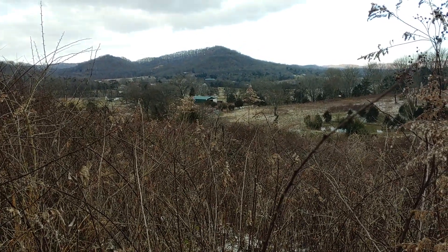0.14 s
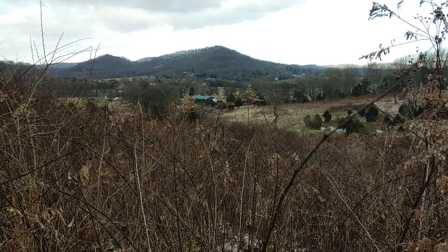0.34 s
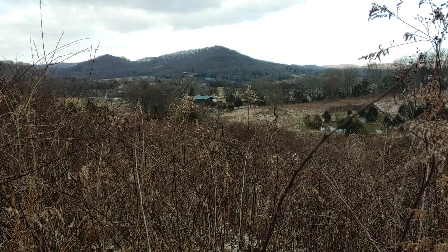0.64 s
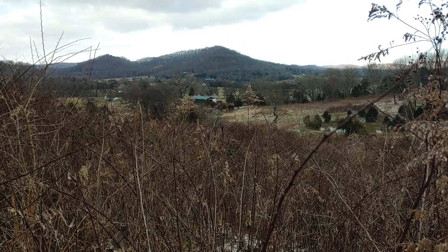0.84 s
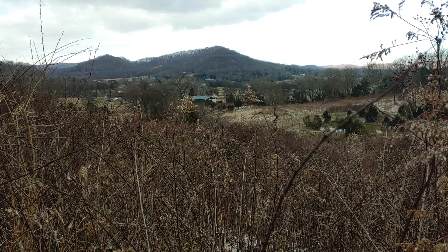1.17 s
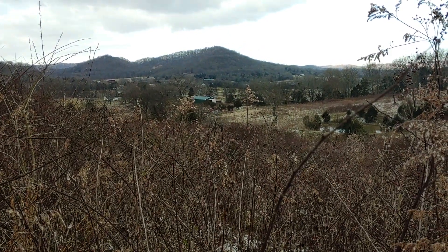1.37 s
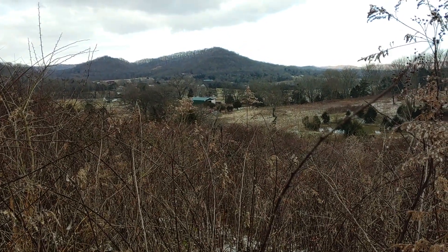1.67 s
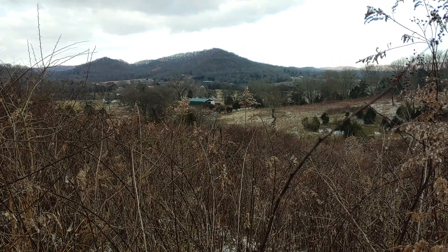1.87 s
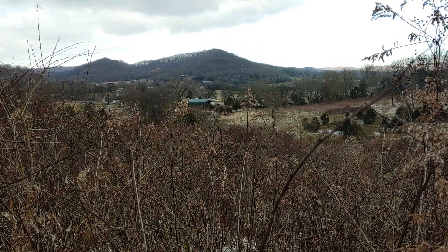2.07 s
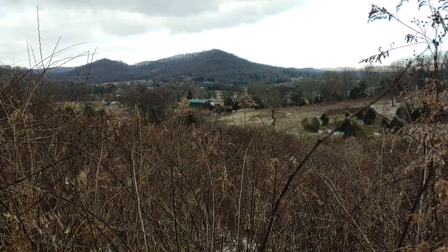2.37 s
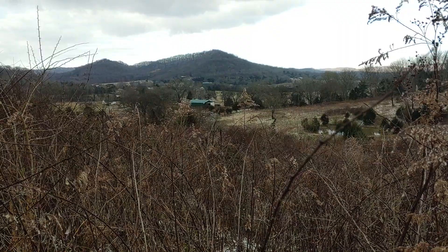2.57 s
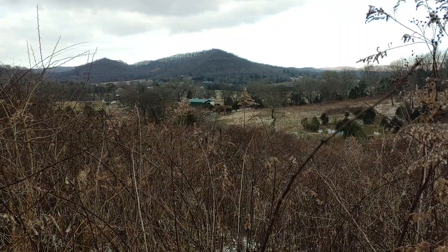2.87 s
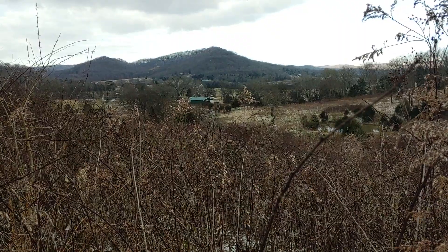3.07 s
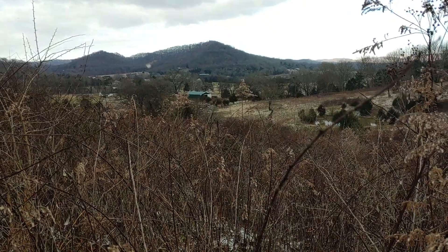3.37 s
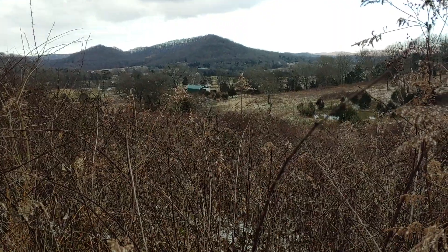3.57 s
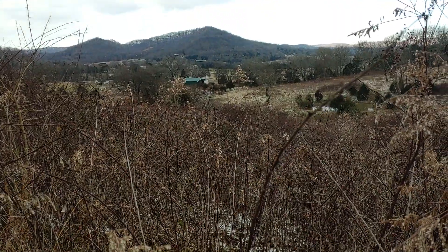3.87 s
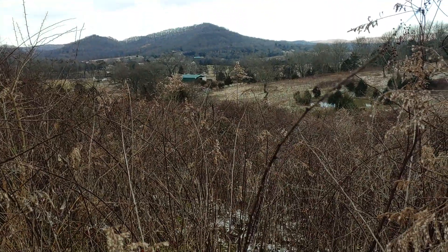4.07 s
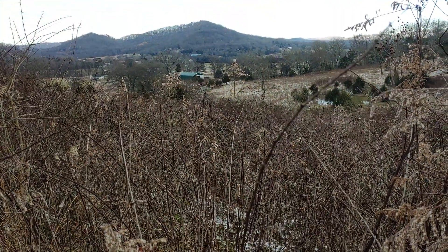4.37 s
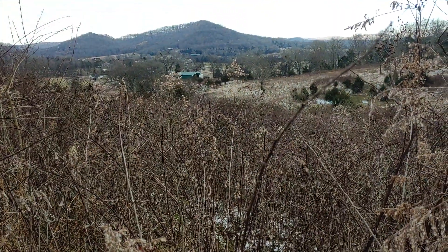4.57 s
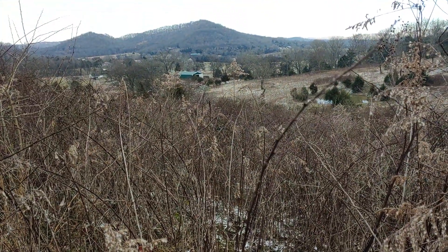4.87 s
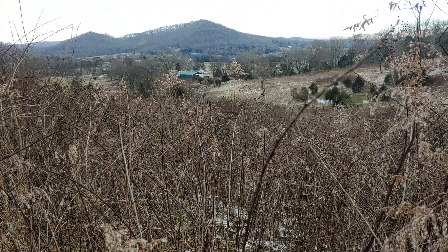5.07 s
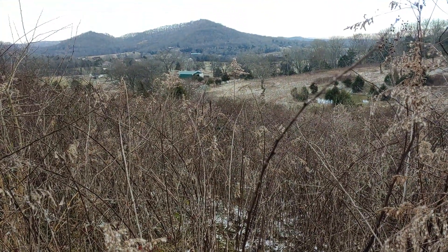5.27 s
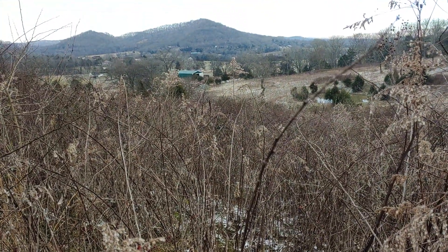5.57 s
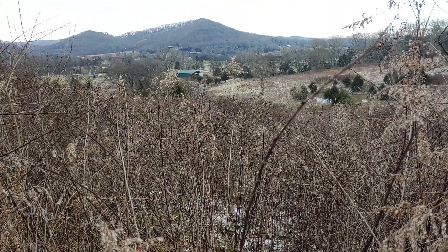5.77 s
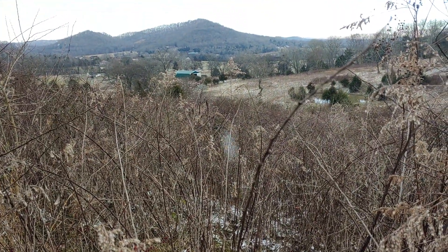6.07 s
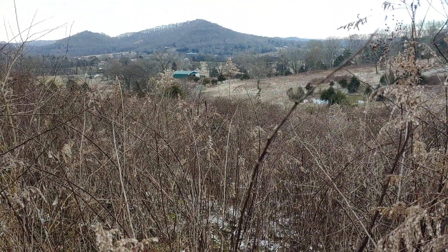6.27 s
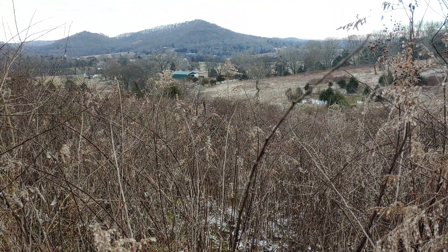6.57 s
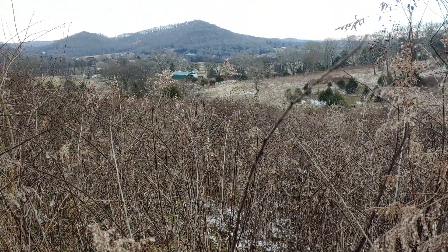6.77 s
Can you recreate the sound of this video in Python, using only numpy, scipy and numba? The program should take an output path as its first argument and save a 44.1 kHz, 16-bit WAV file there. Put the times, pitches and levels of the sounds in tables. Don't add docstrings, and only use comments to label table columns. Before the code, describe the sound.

Repeated hoarse hound baying at close to middle distance in open country, with heavy low wind buffeting midway and dry stems ticking near the end.

```python
import sys
import numpy as np
from scipy import signal
from scipy.fft import rfft, irfft
from scipy.io import wavfile
from scipy.ndimage import uniform_filter1d
from numba import njit

SR = 44100
rng = np.random.default_rng(int(sys.argv[2]) if len(sys.argv) > 2 else 0)


def amplitude_ratio(level_db):
    exponent = np.asarray(level_db, float) / 20
    return 10 ** exponent


def generate_wav(signal):
    frames = np.transpose(np.atleast_2d(signal))
    scaled = np.clip(frames, -1, 1) * 32767
    pcm = np.round(scaled).astype(np.int16)
    wavfile.write(sys.argv[1], SR, pcm)


N = 306054
TIME = np.arange(N) / SR


# (t/s, pitch f/Hz, chest level/dB, open-jaw level/dB)
FIRST_BAY = [(.827, 505, -38.5, -67.5), (.86, 652, -27.5, -42), (.895, 615, -21, -41),
             (1.11, 650, -25, -41.5), (1.2, 545, -34, -50), (1.37, 650, -25, -31.5),
             (1.483, 570, -27.5, -42.5), (1.497, 619, -34, -43.5), (1.61, 539.6, -27.5, -61)]
SECOND_BAY = [(2.198, 534.2, -27.5, -45.5), (2.259, 583, -21.5, -40), (2.39, 585, -22.5, -53.5),
              (2.51, 548, -24.5, -53), (2.6, 617.8, -25, -47), (2.72, 634, -22.5, -53.5),
              (2.763, 620, -24, -55), (2.785, 568.7, -22, -44.5), (2.83, 553.5, -26, -44.5)]
THIRD_BAY = [(3.226, 542, -25, -33), (3.29, 562, -23.5, -36.5), (3.392, 549, -21.5, -45.5),
             (3.503, 610, -23.5, -54), (3.601, 570, -27, -50.5), (3.7, 550, -34, -47)]
FOURTH_BAY = [(4.029, 636.3, -27.5, -38.5), (4.062, 560, -20.5, -38.5), (4.13, 561.8, -27, -41.5),
              (4.279, 560, -22.5, -46), (4.47, 545.6, -29, -69), (4.548, 528, -24.5, -48),
              (4.65, 510.7, -32.5, -43.5)]
FIFTH_BAY = [(5.07, 586.9, -30.5, -43), (5.098, 631.8, -26.5, -35), (5.15, 543.3, -25, -58),
             (5.303, 540.7, -30.5, -53), (5.399, 527, -31.5, -66), (5.472, 532.6, -29, -54),
             (5.563, 494, -41.5, -47.5)]
SIXTH_BAY = [(5.869, 529.5, -29, -45), (5.938, 555, -23, -48), (6.031, 540.7, -29.5, -55),
             (6.089, 510.4, -44, -60)]
LAST_BAY = [(6.903, 570, -24.5, -38), (6.931, 610, -30, -37.5), (6.94, 561, -34, -56.5)]
# (f/Hz, width/Hz, level/dB, change when tired/dB)
UNDERTONE = [(204, 100, -9.5, 0.5), (298, 205, 13.5, -0.5)]
CHEST = [(447, 90, -9.5, 17), (545, 185, 6.5, -1.5), (650, 246, 0.5, -1)]
MOUTH = [(790, 342, -7.5, 0), (1027, 104.5, 8, -1), (1288, 171, -1.5, 4), (1612.7, 85, -17.5, 24.5)]
JAW = [(1948, 110, 5, 0.059), (2320, 170, -3.5, 2.1)]
NOSE = [(2713, 23, 3, 3.2), (2840, 110, 0.5, 2)]
RASP = [(4200, 150, 0.5, -10.5), (4850, 260, -4, -10.5), (5700, 350, -12, 3), (6156, 180, 5.5, 13),
        (6480, 620, -8.5, 4.5)]
POCKET = [(3300, 45, 2.5, 0.0039), (3320, 180, -9, 0.011)]
# (t/s, centre f/Hz, level/dB)
POCKET_FRESH = [
    [(.87, 3115, -69), (.92, 3160, -55.5), (1.05, 3300, -70), (1.23, 3434, -59), (1.4, 3130, -55.5),
     (1.54, 3320, -57), (1.6, 3320, -82.5)],
    [(2.21, 3305, -68.5), (2.42, 3400, -81.5), (2.53, 3380, -62.5), (2.748, 3300, -62), (2.83, 3300, -80)],
    [(3.23, 3260, -54), (3.378, 3420, -88.5), (3.5, 3452, -68.5), (3.62, 3470, -70), (3.68, 3460, -87.5)],
]
POCKET_TIRED = [(4.04, 3300, -80.5), (4.6, 3370, -86), (5.12, 3270, -70.5), (5.2, 3300, -88),
                (5.88, 3225, -64), (6.05, 3300, -74.5)]
# (t/s, mouth level/dB, upper over lower mouth/dB, throat shortened/%)
TONGUE = [(.86, -1.5, 1.5, 5.5), (.92, -5.5, 10.5, -5), (1.05, 1.5, 6, -5), (1.2, -0.5, -10, -1.5),
          (1.33, -6.5, -7.5, 2.5), (1.44, -4.5, 3, -5), (1.54, 4, 1.5, 3), (1.61, 0.5, 7, 2),
          (2.21, 0, 6.5, 5), (2.3, 1.5, 1.5, 1.5), (2.42, 1, -5.5, 5), (2.55, 3, -3.5, 2.5),
          (2.66, 0.5, -13.5, -3), (2.79, 1, 7.5, 1), (3.24, 2.5, 0, -3), (3.36, 2.5, 0.5, 6),
          (3.49, 2.5, -5, -4), (3.63, 0.5, 0.5, 3.5), (3.72, 0, -2.5, -2.5), (4.04, -3, 4.5, 1.5),
          (4.1, -1, 5.5, 5.5), (4.25, -2.5, 4.5, -1), (4.38, 0.5, -4, -0.5), (4.52, 0, 1, 3),
          (4.64, -3.5, 7.5, -2.5), (5.08, 1.5, 1, -3.5), (5.17, 2, -8, -0.5), (5.3, 1, -6.5, -3.5),
          (5.44, 5, -2, 0.5), (5.55, 1.5, -2, 1.5), (5.88, -7, 6.5, -5), (5.97, -4, -6, 0),
          (6.04, -6.5, -3.5, 6), (6.1, -12, -9.5, 5.5), (6.92, -1, 8.5, -2.5)]
# (t/s, growl level/dB, nose level/dB, rasp level/dB, low over high rasp/dB)
PALATE = [(.86, -1, -2, -5, 2), (.95, -5.5, 2.5, 1.5, -1), (1.06, -13, 5, 6, 10),
          (1.2, 3.5, -4.5, 1.5, 6.5), (1.33, -4.5, -1, 1.5, -2), (1.45, 0, 0.5, 0, 1.5),
          (1.6, -10.5, 0, -2.5, -3), (2.22, 6.5, 7.5, -13, 4.5), (2.35, -1.5, -4.5, 1.5, -9),
          (2.5, -5.5, 2, 1, -5), (2.68, -1.5, 1, 0.5, 4), (2.82, -6, 2.5, 2, 5.5), (3.24, 9.5, -1, -4, 1),
          (3.4, 3, -7, -0.5, 0), (3.55, -3.5, 7.5, 2.5, 5), (3.7, -2.5, 1.5, 0.5, -8),
          (4.05, -3, 1, 10.5, 4.5), (4.2, -6, -7, -0.5, 1.5), (4.38, 0.5, 4, 8.5, 5),
          (4.52, 0.5, 1.5, -4, -3), (4.64, 6, -10, 2.5, 2.5), (5.08, 6, -10, 6, -5), (5.2, 2, 9.5, 4, 6),
          (5.35, 0.5, -3, -8, -5.5), (5.54, 11, 5.5, -1.5, 1.5), (5.88, 15, -1.5, -0.5, -4.5),
          (5.98, -2.5, -1.5, 5, 4), (6.1, 7.5, 6, -8, 2), (6.92, 5.5, -0.5, 2.5, 5)]


def hound():
    course = FIRST_BAY + SECOND_BAY + THIRD_BAY + FOURTH_BAY + FIFTH_BAY + SIXTH_BAY + LAST_BAY
    pitch_hz, chest_db, jaw_db = in_time(course)
    age, left, mouth_db, rasp_db, tiring = phrasing()
    pulses, air, alternate = folds(pitch_hz)
    ring_db, upper_db, shortened = in_time(TONGUE)
    growl_db, nostril_db, scrape_db, low_rasp_db = in_time(PALATE)
    pocket_hz, pocket_db = in_time(sum(POCKET_FRESH, []) + POCKET_TIRED)

    mouth_shut = unfinished(age, 0.079) + unfinished(left, 0.094)
    mouth_db = mouth_db + 0.23 * (chest_db + 25.5) + 0.17 * (jaw_db + 41.0) - 9.5 * mouth_shut
    rasp_missing = unfinished(age, 0.11 * (1 + 0.91 * tiring)) + unfinished(left, 0.1)
    rasp_db = rasp_db + 0.41 * (jaw_db + 42.0) - 19.5 * rasp_missing
    nose_db = mouth_db + nasal_opening() + 0.55 * (jaw_db + 49.0)
    under_db = chest_db - 24 + 14 * alternate + 4 * tiring

    rest_hz = 570
    shorter = (uniform_filter1d(pitch_hz, size=2000) / rest_hz) ** .3

    # (cavities, level dB, share of breath, restlessness dB)
    groups = [(UNDERTONE, under_db + growl_db, 1.1, 1.5),
              (CHEST, chest_db, 1.9, 1.5),
              (MOUTH, mouth_db + ring_db, 2.1, 2),
              (JAW, jaw_db - 3.0, 1.3, 2.5),
              (NOSE, nose_db + nostril_db, 1.9, 2.5),
              (POCKET, pocket_db, 2.2, 2.5),
              (RASP, rasp_db + 3.5 + scrape_db, 2.6, 2.5)]
    voice = 0
    for modes, level_db, leak, shift_db in groups:
        source = pulses + leak * air
        rung = 0
        for k, (hz, width, db, tired_db) in enumerate(modes):
            restless = drift(8.0)[0]
            moved = 1 + .015 * restless[::-1]
            if modes is not CHEST:
                moved = moved + shortened / 100
            follows = .25 if modes is RASP else .5 if modes is NOSE else 1
            centre_hz = hz + (hz * shorter * moved - hz) * follows
            if modes is POCKET:
                centre_hz = pocket_hz * hz / POCKET[0][0]
            tilt_db = 0
            if modes is MOUTH:
                tilt_db = 2 * upper_db * np.log2(hz / 1150)
            if modes is RASP and hz < 5300:
                tilt_db = low_rasp_db
            gain = amplitude_ratio(db + tired_db * tiring + shift_db * restless + tilt_db)
            turn, r = np.cos(2 * np.pi * centre_hz / SR), np.exp(-np.pi * 1.87 * width / SR)
            rung = rung + (-1) ** k * gain * gliding(source, turn, r)
        if modes is CHEST:
            throb_hz, throb_at_s, throb_lasts_s = 66, 1.03, .11
            depth = .42 * np.exp(-((TIME - throb_at_s) / throb_lasts_s) ** 4)
            rung = rung * (1 + depth * np.cos(2 * np.pi * throb_hz * TIME + 2 * restless))
        evened = rung / np.sqrt(uniform_filter1d(rung ** 2, size=3000))
        voice = voice + evened * amplitude_ratio(level_db)

    edges_db = -19 * unfinished(age, 0.018) - 28 * np.minimum(unfinished(left, 0.028), 1)
    sounding = amplitude_ratio(edges_db) * np.clip(np.minimum(age, left + 0.0091) / 0.0059, 0, 1)
    return passed(voice * sounding, 6930, "low", order=6)


# (start t/s, end t/s, mouth level/dB, rasp level/dB, throat slackness/0-1)
BAYS = [(0.823, 1.64, -34, -64, 0.23), (2.188, 2.853, -30.5, -57, 0.58), (3.216, 3.748, -31, -62, 0.84),
        (4.012, 4.671, -26.5, -67.5, 0.79), (5.056, 5.588, -30.5, -67, 1), (5.847, 6.13, -25, -59, 1.03),
        (6.894, 7.18, -31, -50, 1)]


def phrasing():
    start, end, mouth_db, rasp_db, tiring = np.array(BAYS)[current_bay()].T
    return TIME - start, end - TIME, mouth_db, rasp_db, tiring


def current_bay():
    starts = np.transpose(BAYS)[0]
    return np.clip(np.searchsorted(starts, TIME) - 1, 0, None)


# (start level/dB, middle level/dB, end level/dB)
NASAL = [(-33, -22.5, -11.5), (-32.5, -26, -26.5), (-19.5, -31.5, -27.5), (-30.5, -23.5, -34.5),
         (-27, -13.5, -35.5), (-26.5, -25, -14.5), (-24, -9, -20)]


def nasal_opening():
    rows = []
    for (start, end, *_), (first, middle, last) in zip(BAYS, NASAL):
        rows += [(start, first), ((start + end) / 2, middle), (end, last)]
    return in_time(rows)[0]


# (t/s, roughness/0-1, strong-weak alternation/0-1)
HOARSE = [(.82, .15, .15), (.86, .65, .4), (.9, .3, .5), (.96, .45, .4), (1.05, .45, .3), (1.2, .75, 1),
          (1.3, .6, .8), (1.38, .42, .3), (1.45, .15, .1), (1.63, .1, .1), (2.19, .3, .15), (2.3, .4, .5),
          (2.45, .45, .4), (2.56, .6, .55), (2.72, .45, .3), (2.79, .2, .1), (2.85, .5, .1),
          (3.21, .25, .15), (3.35, .4, .4), (3.5, .55, .5), (3.64, .9, .3), (3.74, .8, .15),
          (4.01, .4, .15), (4.08, .5, .8), (4.19, .8, .4), (4.3, .5, .4), (4.5, .75, .4), (4.57, .45, .2),
          (4.66, .6, .15), (5.05, .5, .15), (5.14, .35, .3), (5.25, .45, .5), (5.4, .55, .4), (5.5, .6, .3),
          (5.59, .9, .15), (5.85, .5, .15), (5.95, .25, .25), (6.04, .5, .2), (6.12, .8, .15),
          (6.89, .05, .15), (6.915, .15, .2), (6.93, .8, .4)]


def folds(pitch_hz):
    rough, alternate = in_time(HOARSE)
    unsteady = .07 * drift(150)[0] + .045 * drift(30)[0]
    turn = 2 * np.pi * np.cumsum(pitch_hz * (1 + (rough + .1) * unsteady)) / SR
    pulses = sum(np.cos(k * turn) / k for k in range(1, 14))
    shimmer = amplitude_ratio(4.0 * rough * drift(200)[0])
    pulses = pulses * shimmer * (1 + alternate * np.cos(turn / 2))
    hiss = rms_one(passed(rng.standard_normal(N), 1200, "low", order=1))
    air = hiss * (1 + .95 * np.cos(turn))
    return pulses, (rough ** 1.5 + .06) * air, alternate


# (f/Hz, width/Hz, level/dB)
LEFT_PORT = [(610, 60, -5), (397, 200, -9.5), (1112, 110, -16.5), (1731, 96, -25.5), (2534, 900, -13.5),
             (1950, 950, 5.5), (5450, 480, -8)]
RIGHT_PORT = [(600, 2500, 3), (400, 120, -13), (1660, 31, -12), (2180, 1060, -19.5), (3480, 1100, -14.5),
              (6000, 630, -28.5)]


def at_ports(voice):
    return np.array([reshaped(voice, shadows) for shadows in (LEFT_PORT, RIGHT_PORT)])


# (f/Hz, width/Hz, level/dB)
HILLS_COLOUR = [(364, 61, -15), (474, 350, 0), (560, 93, -8), (1130, 210, 0), (1760, 63, 12.5),
                (1960, 120, 9.5), (2090, 300, 0)]


def echoes(voice):
    brush_t60_s, hills_t60_s, hills_rise_s = 0.047, 2.46, 0.18
    brush = rms_one(rng.standard_normal((2, N)) * amplitude_ratio(-60 * TIME / brush_t60_s)) * amplitude_ratio(-17.5)
    brush = brush + amplitude_ratio(3.5) * passed(brush, 1200, "high")
    swell = 1 - np.exp(-(TIME / hills_rise_s) ** 2)
    swell = swell * amplitude_ratio(-60 * TIME / hills_t60_s + 4.4 * drift(5.6))
    hills = rms_one(passed(rng.standard_normal((2, N)), 580, "low") * swell) * amplitude_ratio(-28.5)
    hills = reshaped(hills, HILLS_COLOUR)
    near = signal.fftconvolve(voice[None], brush[:, :SR // 2], axes=1)[:, :N]
    far = signal.fftconvolve(towards_hills(voice)[None], hills, axes=1)[:, :N]
    return (near + far) / np.sqrt(N)


# (echo level/dB, extra treble/dB, growl level/dB)
HEADING = [(-2, 5.5, -7.5), (-0.7, 6, 7), (3.3, 1, 2), (2.5, -0.5, 3), (0.8, 0, 3), (-0.3, 0.5, 1.5),
           (-4, 2, 2)]


def towards_hills(voice):
    echo_db, treble_db, growl_db = np.array(HEADING)[current_bay()].T
    treble = (amplitude_ratio(treble_db) - 1) * passed(voice, 510, "high")
    growl = (amplitude_ratio(growl_db) - 1) * resonance(voice, 400, 140)
    return amplitude_ratio(echo_db) * (voice + treble + growl)


def wind():
    port = amplitude_ratio(-3.5) * gusts()
    lumps = amplitude_ratio(5.03 * drift(20, channels=2))
    low = passed(rng.standard_normal((2, N)), [45, 105], "band")
    low = rms_one(lumps) * low / np.sqrt(uniform_filter1d(low ** 2, size=2600))
    high = lumps ** 2.0 * passed(rng.standard_normal((2, N)), [95, 185], "band", order=3)
    high = high / np.sqrt(uniform_filter1d(high ** 2, size=6000))
    rumble = port * (low + 1.48 * np.sqrt(port) * high)
    flutter = rms_one(passed(rng.standard_normal((2, N)), [190, 420], "band"))
    flutter = amplitude_ratio(-10.5) * port ** 1.556 * lumps ** 1.37 * flutter
    return passed(passed(rumble + flutter + thumps(), 30, "high"), 600, "low")


# (t/s, hold/s, level/dB, left minus right/dB)
GUSTS = [(0, 0.021, -47.5, 16), (0.186, 0.14, -47.5, 24), (0.533, 0.058, -48, -7), (0.784, 0.016, -51, 0),
         (2.763, 0.1, -48.5, -37), (2.97, 0.05, -31, 0.5), (3.127, 0.18, -27.5, 4.5),
         (3.279, 0.014, -22, 3), (3.439, 0.096, -23.5, -1), (3.59, 0.11, -23, -1),
         (3.772, 0.063, -26.5, 15), (3.865, 0.048, -23, 4), (3.997, 0.012, -18.5, 15),
         (4.036, 0.15, -27, 0), (4.223, 0.061, -31.5, -19), (4.425, 0.17, -50, -11.5),
         (4.641, 0.057, -24, 35), (4.736, 0.032, -30, 33), (4.795, 0.047, -31.5, 45),
         (4.914, 0.13, -42.5, 18), (5.396, 0.1, -44, -23), (5.598, 0.12, -24.5, 38),
         (5.769, 0.059, -24, 11.5), (5.89, 0.08, -16.5, 25), (5.989, .012, -24.5, -7),
         (6.099, 0.0083, -41, 1), (6.291, 0.017, -39, 33), (6.438, 0.032, -43.5, 24),
         (6.652, 0.043, -45.5, 23), (6.8, 0.046, -53, 10)]
# (t/s, level/dB)
BREEZE = [(0, -62), (.68, -65), (.9, -68), (2.2, -62), (2.7, -51.5), (5.28, -66), (6.94, -62)]


def gusts():
    rise_db_per_s, fall_db_per_s = 361, 255
    power = amplitude_ratio(2 * in_time(BREEZE)[0]) * np.ones((2, 1))
    for s, hold, db, lean_db in GUSTS:
        before_db = rise_db_per_s * np.maximum(s - TIME, 0)
        after_db = fall_db_per_s * np.maximum(TIME - s - hold, 0)
        power = power + (panned(lean_db)[:, None] * amplitude_ratio(db - before_db - after_db)) ** 2
    return np.sqrt(power)


# (t/s, peak level/dB, f/Hz, left minus right/dB)
THUMPS = [(0.015, -41, 44, -19), (0.085, -40, 57, -28), (0.173, -37, 111, 20), (0.236, -32.5, 59, 24),
          (0.253, -36.5, 124, 23), (0.325, -44.5, 101, 20), (0.425, -37, 51.7, -26), (0.476, -33, 49, -32),
          (0.548, -31, 101, -32), (0.572, -26, 72.5, -37), (2.83, -35, 59.4, -27),
          (2.903, -32.5, 74, -10.5), (2.923, -25, 85.26, -24), (3.149, -34, 112, -4.5),
          (3.235, -21, 91, 18), (3.281, -21.5, 55.28, -33), (3.289, -17, 95.87, -19),
          (3.409, -14.5, 74.46, -39), (3.524, -19.5, 86, -6.5), (3.612, -19, 83.6, 10),
          (3.642, -22.5, 170, 11.5), (3.972, -11, 135, 20.5), (3.963, -16, 260, 24),
          (4.044, -23, 78.83, -11), (4.309, -25, 75, -21.5), (4.402, -32.5, 56.16, 19),
          (4.642, -17.5, 115, 38), (4.671, -17.5, 234, 36), (4.82, -25.5, 110.7, 39),
          (5.653, -41, 118.1, 42), (5.661, -30, 76.4, 43), (5.749, -15, 118, 37), (5.801, -22, 111.5, 20.5),
          (5.878, -17, 152, 23), (5.959, -17.5, 130.4, 13), (6.084, -28, 59.1, 4), (6.115, -33, 270, 2),
          (6.269, -31, 72.37, 20), (6.422, -40, 68.7, 25), (6.62, -34, 80.8, 8.5), (6.775, -39.5, 56.15, 4)]


def thumps():
    out, age = np.zeros((2, N)), np.arange(SR // 8) / SR
    for k, (s, db, hz, lean_db) in enumerate(THUMPS):
        sides = panned(lean_db)[:, None]
        hz = hz * np.where(sides < 1, 1.25 ** (-1) ** k, 1)
        swelling = (1 - np.exp(-age * hz * 3.5)) ** 2
        blow = np.sin(2 * np.pi * hz * age) * swelling * np.exp(-age * hz * 0.96)
        at = round(s * SR)
        out[:, at:at + len(age)] += (amplitude_ratio(db + 9.0) * sides * blow)[:, :N - at]
    return out


# (t/s, level/dB)
RUSTLE = [(0, -87.5), (1.6, -85), (3.0, -79), (4.7, -79), (5.1, -75.5), (5.8, -74.5), (5.93, -66),
          (5.945, -47.5), (5.99, -68.5), (6.3, -68), (6.45, -76.5), (6.52, -71.5), (6.6, -84), (6.78, -74),
          (6.82, -75.5), (6.94, -69)]
# (f/Hz, level/dB)
STEMS = [(700, -17.5), (2000, -2.5), (3600, 4.5), (5200, -3), (6500, 2.5), (7000, -2), (7500, -19.5),
         (12000, -23), (13000, -36)]


def rustle():
    struck = rng.random((2, N)) < 2500 / SR
    strength = amplitude_ratio(4.5 * np.minimum(rng.exponential(1, (2, N)), 5))
    grains = struck * strength * rng.choice([-1, 1], (2, N))
    return amplitude_ratio(in_time(RUSTLE)[0] + 0.7 * drift(4.9)) * coloured(grains, STEMS)


# (t/s, peak level/dB, left minus right/dB)
TICKS = [(3.188, -56.5, 3), (3.799, -59, 7), (4.818, -53, 5), (6.712, -62, 6), (6.9378, -39, 5),
         (4.751, -47, 2), (5.443, -62, 14), (5.942, -31.5, 2), (6.789, -40.5, 6.5), (6.857, -67, 6),
         (6.9267, -28, 5)]


def ticks():
    snaps, age = np.zeros((2, N)), np.arange(400) / SR
    for s, db, lean_db in TICKS:
        crackle = rng.standard_normal((2, 400)) * np.exp(-age / 0.002)
        at = round(s * SR)
        snaps[:, at:at + 400] += (amplitude_ratio(db + 1.5) * panned(lean_db)[:, None] * crackle)[:, :N - at]
    snaps = passed(snaps, 1800, "high")
    dry_snap = passed(passed(snaps, 8000, "low", order=1), 12500, "low", order=6)
    upper = resonance(resonance(snaps, 6400, 800), 6400, 800)
    lower = resonance(resonance(snaps, 4100, 900), 4100, 900)
    return 0.035 * dry_snap + 2.0 * upper + 1.7 * lower


# (t/s, length/s, pitch f/Hz, level/dB, fall per partial/dB)
SQUEAKS = [(5.69, .006, 2100, -66, 30), (5.722, .008, 2130, -70, 30), (6.62, .0088, 469, -51.5, 5),
           (6.54, .016, 4050, -72, 30), (6.51, .02, 3600, -76, 30)]


def squeaks():
    out = 0
    for s, length, hz, db, fall_db in SQUEAKS:
        age = TIME - s
        strongest = max(1, 890 / hz)
        tone = 0
        for k in range(1, 6):
            tone = tone + amplitude_ratio(-fall_db * abs(k - strongest)) * np.sin(k * 2 * np.pi * hz * age)
        out = out + amplitude_ratio(db) * tone * np.exp(-(age / length) ** 4)
    return out


# (f/Hz, level per Hz/dB)
FIELD = [(40, 7.5), (100, 0.5), (300, -14.5), (1000, -19.5), (2200, -31.5), (4500, -50.5), (6300, -36.5),
         (7300, -46), (12500, -47), (15500, -61.5)]


def hush():
    level_db = -62 + 4.5 + 0.65 * drift(3.9)
    return amplitude_ratio(level_db) * coloured(rng.standard_normal((2, N)), FIELD)


def rms_one(x):
    return x / np.sqrt(np.mean(x ** 2) + 1e-20)


def in_time(rows):
    s, *columns = np.transpose(rows)
    return [np.interp(TIME, s, c) for c in columns]


def unfinished(age, span_s):
    return np.clip(1 - age / span_s, 0, 1)


def drift(hz, channels=1):
    r = np.exp(-2 * np.pi * hz / SR)
    noise = rng.standard_normal((channels, N + SR))
    return rms_one(signal.lfilter([1], [1, -2 * r, r * r], noise)[:, SR:])


def passed(x, hz, kind, order=2):
    return signal.sosfilt(signal.butter(order, hz, kind, fs=SR, output="sos"), x)


def resonance(x, hz, width_hz):
    r = np.exp(-np.pi * width_hz / SR)
    top = np.array([1, 0, -1]) * (1 - r * r) / 2
    return signal.lfilter(top, [1, -2 * r * np.cos(2 * np.pi * hz / SR), r * r], x)


def reshaped(x, peaks):
    for hz, width, db in peaks:
        x = x + (amplitude_ratio(db) - 1) * resonance(x, hz, width)
    return x


@njit
def gliding(x, turn, r):
    for _ in range(2):
        y = np.zeros(len(x))
        for i in range(2, len(x)):
            y[i] = (1 - r * r) / 2 * (x[i] - x[i - 2]) + 2 * r * turn[i] * y[i - 1] - r * r * y[i - 2]
        x = y
    return x


def coloured(x, spectrum):
    hz, db = np.transpose(spectrum)
    grid = np.maximum(np.fft.rfftfreq(N, 1 / SR), 1)
    return rms_one(irfft(rfft(x) * amplitude_ratio(np.interp(np.log(grid), np.log(hz), db)), N))


def panned(db):
    return np.sqrt(2 / (1 + amplitude_ratio(2 * np.array([-db, db]))))


def scene():
    voice = hound()
    return at_ports(voice) + echoes(voice) + wind() + rustle() + ticks() + squeaks() + hush()


def low_pass(x):
    return signal.sosfilt(signal.butter(12, 15720, fs=SR, output="sos"), x)


def record(dry):
    mix = 0.82 * np.tanh(dry / 0.74)
    return low_pass(mix)


dry = scene()
out = record(dry)
generate_wav(out)
```